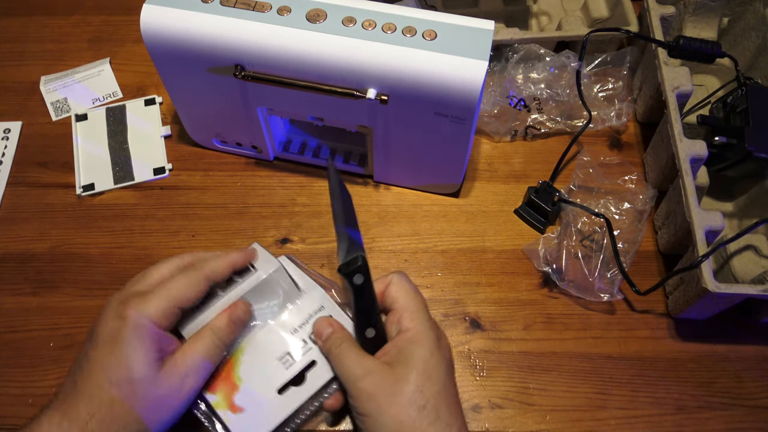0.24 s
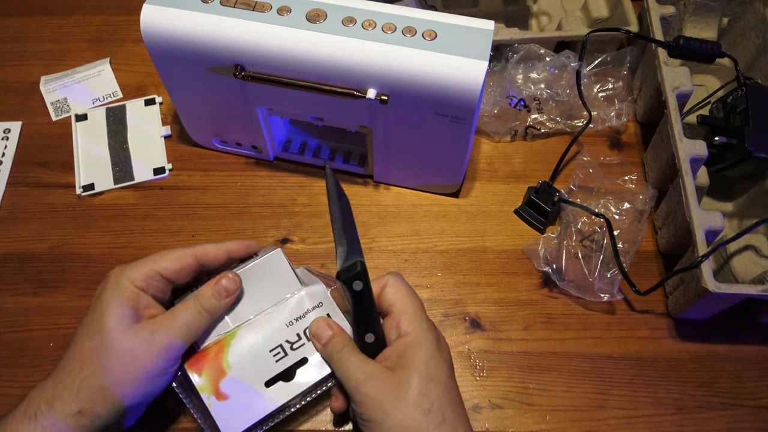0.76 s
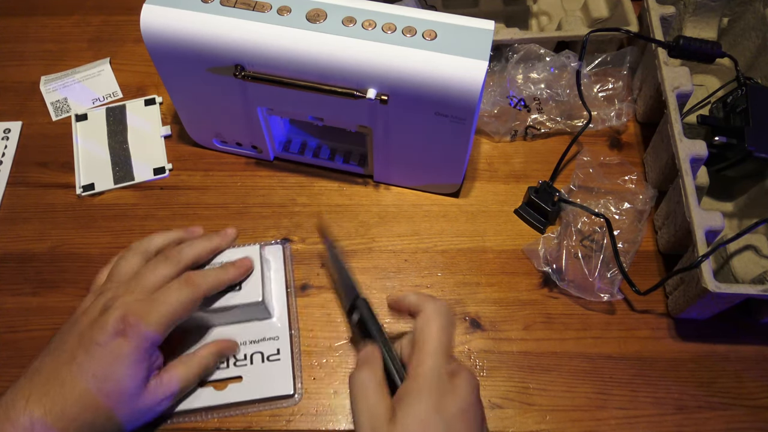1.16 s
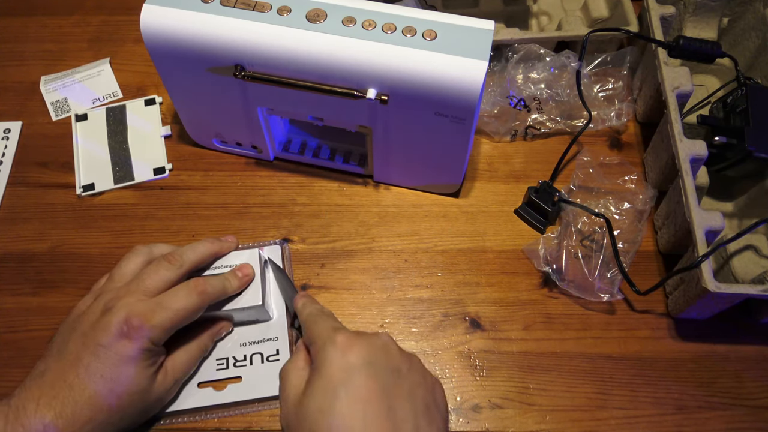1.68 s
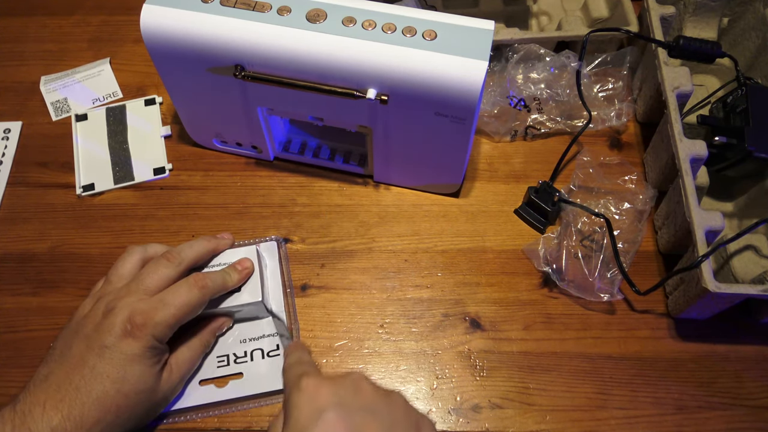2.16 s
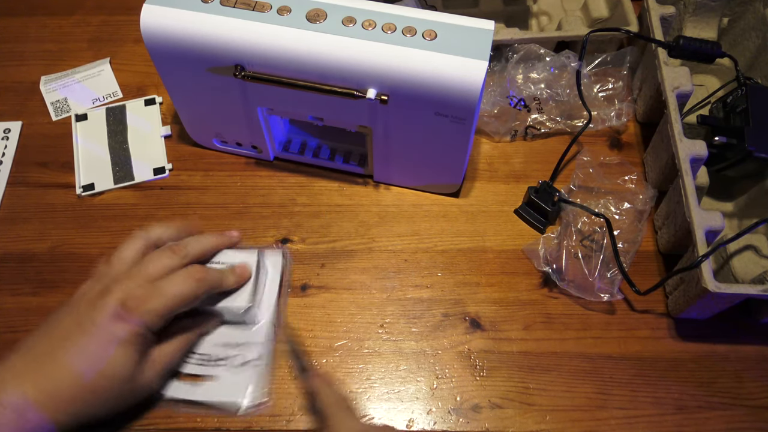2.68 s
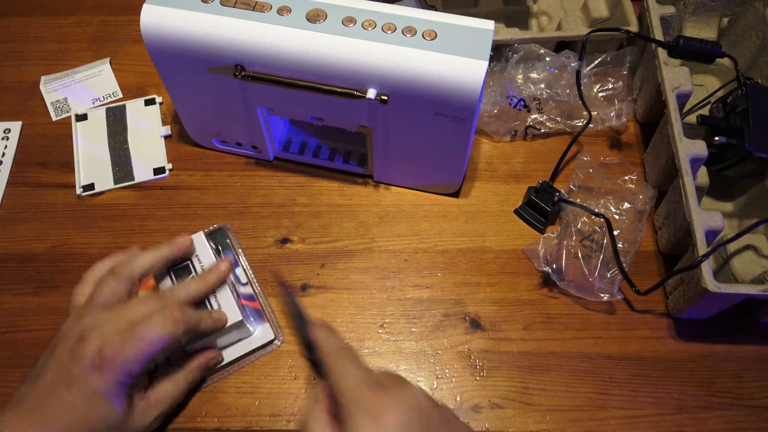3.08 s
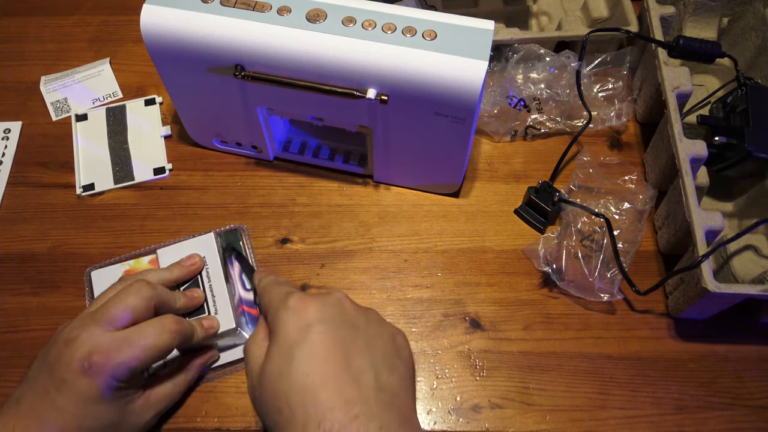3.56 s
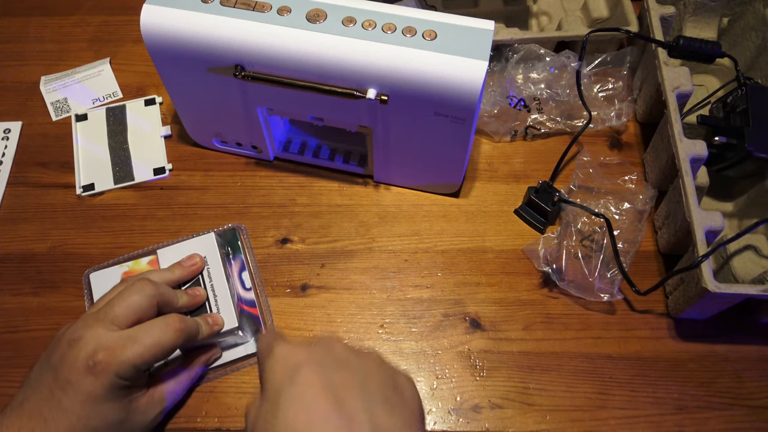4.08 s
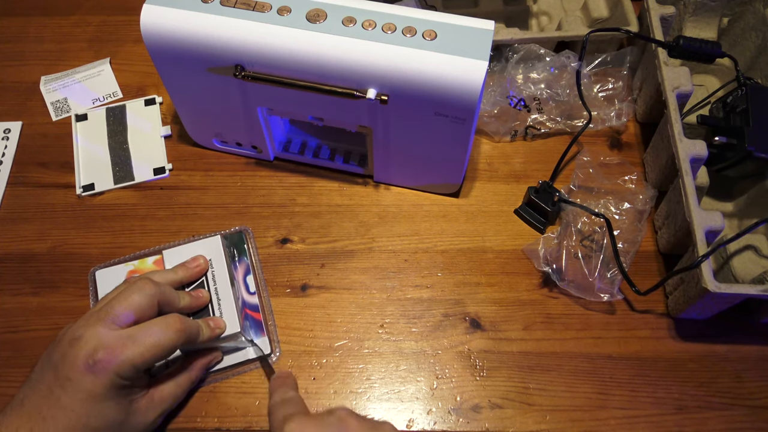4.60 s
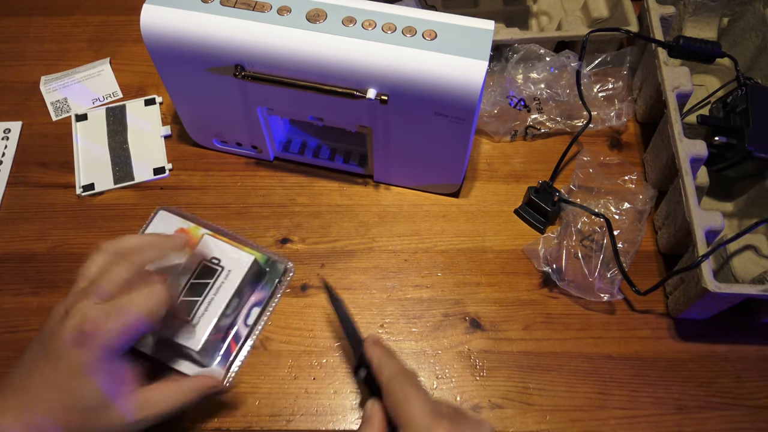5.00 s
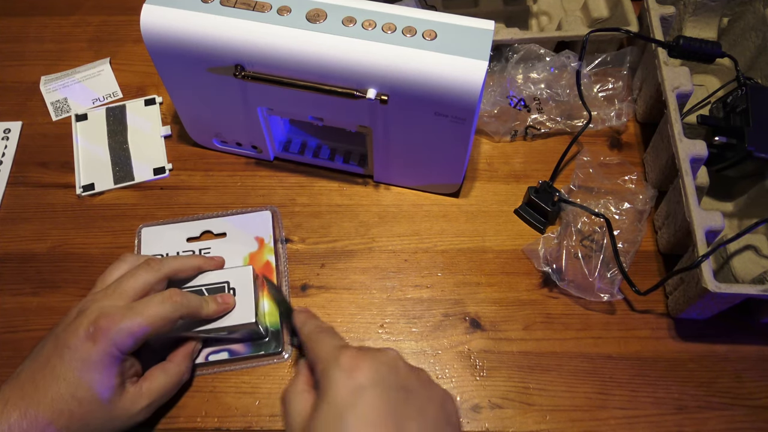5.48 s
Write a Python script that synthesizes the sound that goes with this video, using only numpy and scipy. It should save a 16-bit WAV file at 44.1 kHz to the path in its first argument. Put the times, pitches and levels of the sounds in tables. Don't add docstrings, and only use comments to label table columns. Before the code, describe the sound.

Close crackling and scraping of hard plastic packaging being cut by a knife, with sharp pops and two heavy wooden knocks indoors.

```python
import sys
import numpy as np
from scipy import signal
from scipy.fft import rfft, irfft, next_fast_len
from scipy.io import wavfile
from scipy.ndimage import uniform_filter1d

SR = 44100
rng = np.random.default_rng(int(sys.argv[2]) if len(sys.argv) > 2 else 0)


def pcm_store(signal):
    levels = np.round(np.clip(np.atleast_2d(signal), -1, 1) * 32767)
    wavfile.write(sys.argv[1], SR, levels.astype(np.int16).T)


def volts_from_decibels(level):
    exponent = np.asarray(level, float) / 20
    return 10 ** exponent


N = 253134
TIME = np.arange(N) / SR


def rms_one(x):
    return x / np.sqrt(np.mean(x ** 2) + 1e-20)


def in_time(rows):
    s, *columns = np.transpose(rows)
    return [np.interp(TIME, s, c) for c in columns]


def shaped(x, points, law=volts_from_decibels):
    size = next_fast_len(N + 4096)
    hz = np.maximum(np.arange(size // 2 + 1) * SR / size, 1)
    curve_hz, curve_db = np.transpose(points)
    db = np.interp(np.log(hz), np.log(curve_hz), curve_db)
    return irfft(rfft(x, size) * law(db), size)[..., :N]


def band(x, low_hz, high_hz):
    sos = signal.butter(2, [low_hz, high_hz], "band", fs=SR, output="sos")
    return signal.sosfilt(sos, x + 1e-18)


def resonate(x, modes):
    out = 0
    for k, (hz, width, db) in enumerate(modes):
        r = np.exp(-np.pi * width / SR)
        gain = (-1) ** k * volts_from_decibels(db) * (1 - r * r) / 2
        out = out + signal.lfilter([gain, 0, -gain], [1, -2 * r * np.cos(2 * np.pi * hz / SR), r * r], x)
    return out


def ring(clicks, hz, t60):
    r, w = volts_from_decibels(-60 / (t60 * SR)), 2 * np.pi * hz / SR
    return signal.lfilter([0, np.sin(w)], [1, -2 * r * np.cos(w), r * r], clicks + 1e-18)


def dying_after(clicks, t60):
    return signal.lfilter([1], [1, -volts_from_decibels(-60 / (t60 * SR))], clicks)


def grit(per_s, spread_db):
    sizes = volts_from_decibels(spread_db * np.minimum(rng.exponential(1, N), 5)) * rng.choice([-1, 1], N)
    return rms_one(sizes * (rng.random(N) < per_s / SR))


def marks(times, sizes):
    clicks = np.zeros(N)
    np.add.at(clicks, np.round(np.asarray(times) * SR).astype(int), sizes)
    return clicks


def strikes(s, db, modes, uneven_db):
    luck = rng.normal(0, uneven_db, (len(s), len(modes)))
    out = 0
    for k, (hz, level_db, t60) in enumerate(modes):
        blows = marks(s, volts_from_decibels(db + level_db + luck[:, k]))
        out = out + (-1) ** k * ring(blows, hz, t60)
    return out


def snaps(s, db, hollow_db, bright_db, hz):
    rattle, out = grit(12000, spread_db=3.0), np.zeros(N)
    parts = [(219, 576, hollow_db - 5.0, 0.085),
             (1000, 8200, -5.0, 0.05),
             (6000, 17900, bright_db - 9.5, 0.053)]
    for low_hz, high_hz, part_db, t60 in parts:
        clicks = marks(s, volts_from_decibels(db + part_db))
        scale = 1 / np.std(band(rattle, low_hz, high_hz))
        out += scale * band(dying_after(clicks, t60) * rattle + 2.4 * clicks, low_hz, high_hz)
    after = np.arange(2000) / SR
    starts = np.round(s * SR).astype(int)
    for start, level_db, pitch in zip(starts, db, np.broadcast_to(hz, len(s))):
        fall_db = 60 * after * pitch / 25
        tone = volts_from_decibels(level_db + 0.5 - fall_db) * np.sin(2 * np.pi * pitch * after)
        out[start:start + len(tone)] += tone[:N - start]
    return out


# f/Hz, level/dB per Hz
AIR_SPECTRUM = [(15, -29), (25, -22), (49, -2), (76, -12), (108, -20.5), (134, -2), (301, -2.5),
                (677, -15.5), (1190, -5.5), (1940, -22), (16000, -29)]


def room_air():
    return volts_from_decibels(-56.5) * rms_one(shaped(rng.standard_normal((2, N)), AIR_SPECTRUM))


def echoes(x, t60):
    t = np.arange(SR // 2) / SR
    tail = rng.standard_normal(len(t)) * volts_from_decibels(-60 * t / t60) * (t > .003)
    return signal.fftconvolve(x, tail / np.linalg.norm(tail))[:N]


def room(hits):
    return volts_from_decibels(-9) * signal.lfilter([.6], [1, -.4], echoes(hits, t60=0.28))


# f/Hz, width/Hz, level/dB
SHELL_MODES = [(700, 430, 3), (1480, 550, 9), (1900, 730, 0.5), (2680, 200, 3.5), (3950, 2350, -5.5),
               (5540, 1600, 12.5), (7350, 2970, 8.5)]


def friction():
    slips = grit(9000, spread_db=2.5) + 0.47 * grit(500, spread_db=2.5)
    return slips + 1.38 * resonate(slips, SHELL_MODES)


# t/s, level/dB
LEANS = [
    (0.23, -44),
    (0.9, -57),
    (1.15, -51),
    (1.95, -47.5),
    (2.12, -53),
    (3.96, -43.5),
    (4.1, -42),
    (4.33, -45.5),
    (5.2, -63),
]


def leg_shudder(slips):
    s, db = np.transpose(LEANS)
    dying = dying_after(marks(s, volts_from_decibels(db)), t60=0.52)
    swell = volts_from_decibels(-71) + uniform_filter1d(dying, int(0.02 * SR))
    return swell * (rms_one(band(slips, 52, 85)) + volts_from_decibels(-5.5) * rms_one(band(slips, 121, 159)))


# t/s, level/dB
HANDLING = [(0.0, -40), (0.45, -44.5), (0.62, -38.5), (0.84, -51), (1.2, -38), (1.4, -57), (1.56, -52),
            (1.93, -45.5), (2.3, -62), (2.45, -59), (2.7, -49), (3.32, -43.5), (3.52, -69), (3.9, -60),
            (4.44, -49), (4.75, -51), (5.1, -43.5), (5.62, -56)]


def handling():
    parts_db = np.array([[-2], [0], [-4.5]])
    return volts_from_decibels(2 * (in_time(HANDLING)[0] - 7.5 + parts_db))


def strokes(rows, film_db):
    rounding = 1.09
    damping = 0.15
    out = np.zeros((3, N))
    for s, db, rise, fall, weight_db in rows:
        rise = min(rise, 0.17)
        near = slice(max(int((s - 3 * rise) * SR), 0), int((s + 3 * fall) * SR))
        late = TIME[near] - s
        level_db = db - 20 * np.where(late < 0, -late / rise, late / fall) ** rounding
        parts_db = np.array([[weight_db], [0], [film_db - damping * weight_db]])
        out[:, near] += volts_from_decibels(2 * (level_db + parts_db))
    return out


# peak t/s, level/dB, rise/s, fall/s (20 dB each), board weight/dB
DRAGS = [(0.8, -45.5, 0.19, 0.07, 3.5), (0.878, -29.5, 0.017, 0.096, 3), (0.92, -28.5, 0.053, 0.06, -19),
         (1.0, -28.5, 0.15, 0.14, -23), (1.04, -31.5, 0.1, 0.021, -1.5), (1.125, -32, 0.13, 0.058, -9),
         (2.68, -37.5, 0.064, 0.27, -6.5), (2.74, -43.5, 0.094, 0.11, 7.5),
         (2.782, -25, 0.065, 0.22, -12.5), (2.83, -25.5, 0.054, 0.061, -8.5),
         (2.95, -42.5, 0.056, 0.14, 2.5), (3.09, -35.5, 0.023, 0.048, -3), (3.13, -39.5, 0.038, 0.038, -13),
         (3.235, -28.5, 0.027, 0.053, -8), (4.8, -33, .035, 0.36, -5.5), (4.865, -36.5, 0.06, 0.032, 1),
         (4.93, -23, 0.06, 0.086, -7), (5.2, -19.5, 0.041, 0.12, -5), (5.25, -20.5, 0.063, 0.031, -57),
         (5.4, -44.5, 0.21, 0.11, -1)]


def drags():
    return strokes(DRAGS, film_db=-6)


# peak t/s, level/dB, rise/s, fall/s (20 dB each), board weight/dB
TEARS = [(0.001, -36.5, 0.0087, 0.07, -17), (0.16, -48, 0.13, .1, -8), (0.2, -12, 0.005, 0.13, -16),
         (0.238, -15.5, 0.045, 0.089, -4.5), (1.44, -46.5, 0.025, 0.41, -15), (1.7, -59.5, 0.04, 0.064, 21),
         (2.0, -33.5, 0.09, 0.15, -1.5), (2.17, -43.5, 0.22, 0.18, 0.5), (3.625, -57.5, 0.037, 0.031, 8.5),
         (3.75, -57.5, 0.062, 0.058, 14.5), (3.79, -52.5, 0.11, 0.15, 3), (3.99, -26, 0.087, 0.12, -5),
         (4.06, -30, 0.023, 0.26, 1), (4.16, -34.5, 0.12, 0.13, -8), (4.36, -44, 0.19, 0.27, -4),
         (5.69, -43, 0.072, 0.23, -5)]


def tears():
    return strokes(TEARS, film_db=-4.5)


# f/Hz, level/dB, t60/s
BOARD_MODES = [(130, -23, 0.3), (211.6, -18.5, 0.55), (253.3, -1, 0.58), (275, -13.5, 0.2), (300, -7, 0.37),
               (330, -9.5, 0.052), (350.7, 2, 0.075), (418, -4, 0.066), (487.5, -2, 0.06),
               (653, -3.5, 0.042), (718, -3.5, 0.012), (816, -5.5, 0.054), (1073, -8.5, 0.1),
               (1212, -9, 0.046)]


def rasp(slips):
    board, shell, film = np.sqrt(handling() + tears() + drags())
    wood = resonate(slips, [(hz, 45.0, db) for hz, db, t60 in BOARD_MODES]) + 0.4 * slips
    return (board * rms_one(band(wood, 96, 1014)) + shell * rms_one(band(slips, 853, 4280))
            + film * rms_one(band(slips, 2240, 18740)))


# peak t/s, level/dB, swell/s, f/Hz, width/Hz
PANELS = [(0.899, -32, 0.02, 1000, 150), (2.79, -37, 0.078, 1440, 119), (2.79, -34.5, .06, 2100, 250),
          (2.8, -33, 0.052, 5560, 400), (2.96, -39, 0.044, 1290, 500), (2.96, -54, 0.021, 3045, 300),
          (3.09, -41.5, .03, 1200, 200), (3.21, -46, 0.021, 700, 120), (3.235, -40.5, 0.027, 1220, 150),
          (3.64, -56, .04, 1370, 80), (3.64, -58, .04, 1860, 80), (4.12, -43, 0.086, 1070, 50),
          (4.13, -47, 0.036, 577, 50), (4.83, -65, 0.055, 6900, 2000), (4.94, -39, 0.032, 1670, 500),
          (5.2, -30.5, 0.014, 3000, 400), (5.22, -39, 0.046, 1380, 200), (5.245, -29, 0.043, 6000, 1500),
          (5.39, -43.5, 0.047, 5640, 1200), (5.368, -28, 0.0063, 1590, 900),
          (0.98, -23.5, 0.0074, 1550, 600), (1.122, -27.5, 0.018, 1210, 200),
          (1.46, -43, 0.039, 6000, 2500), (1.45, -50, 0.033, 11000, 5000), (1.46, -45.5, 0.046, 3000, 1200),
          (0.221, -22.5, 0.03, 2850, 900), (4.32, -44, 0.027, 8900, 5000), (4.9, -33.5, 0.042, 1060, 400),
          (3.77, -49.5, 0.064, 1920, 350), (3.78, -55, 0.051, 3050, 400), (0.17, -47, .02, 8000, 2500),
          (1.96, -28, 0.013, 2070, 600), (3.929, -26.5, .012, 1550, 500)]


def panels():
    slips, out = grit(4000, spread_db=3.0), np.zeros(N)
    for s, db, swell, hz, width in PANELS:
        near = slice(int((s - 3 * swell) * SR), int((s + 3 * swell) * SR))
        sung = rms_one(resonate(slips[near], [(hz, width, 0)]))
        out[near] += volts_from_decibels(db - 9.9 * ((TIME[near] - s) / swell) ** 2) * sung
    return out


# t/s, f/Hz, level/dB, t60/s
SHELL_RING = [
    (1.981, 1730, -22, 0.28),
    (1.981, 2960, -20.5, 0.27),
    (1.69, 1330, -38, 0.23),
]


def shell_ring():
    noise, out = rng.standard_normal(N), 0
    for s, hz, db, t60 in SHELL_RING:
        decay = volts_from_decibels(db - 60 * np.maximum(TIME - s, 0) / t60) * (TIME > s)
        out = out + decay * rms_one(resonate(noise, [(hz, 250, 0)]))
    return out


# t/s, level/dB
BLADE_PRESS = [
    (1.68, -72),
    (1.76, -62),
    (1.94, -57),
    (1.96, -87),
    (2.42, -85),
    (2.47, -66),
    (2.62, -60),
    (2.72, -64),
    (2.76, -85),
]
# f/Hz, width/Hz, level/dB
BLADE_MODES = [
    (3830, 193, 8),
    (6250, 150, 0),
]


def blade():
    return volts_from_decibels(in_time(BLADE_PRESS)[0]) * rms_one(resonate(rng.standard_normal(N), BLADE_MODES))


# t/s, slip rate f/Hz, level/dB
CREAK = [
    (4.275, 690, -36),
    (4.287, 600, -31),
    (4.312, 574, -36.5),
]


def creak():
    hz, db = in_time(CREAK)
    flutter = rms_one(band(rng.standard_normal((2, N)), 40, 490))
    phase = 2 * np.pi * np.cumsum(hz * (1 + 0.018 * flutter[0])) / SR
    sounding = (TIME > CREAK[0][0]) & (TIME < CREAK[-1][0])
    partials = [(1, -4), (2, -3), (3, -3), (4, -14), (6, -12)]   # multiple, dB
    wave = sum(volts_from_decibels(level) * np.sin(k * phase) for k, level in partials)
    return volts_from_decibels(db + 3.5 * flutter[1]) * sounding * wave


# t/s, f/Hz, level/dB
SQUEALS = [
    [(4.277, 6000, -54), (4.283, 6870, -40.5), (4.29, 8500, -44), (4.297, 8900, -37), (4.3, 11400, -35),
     (4.306, 14800, -32), (4.314, 15500, -55)],
    [(4.35, 15700, -55), (4.354, 14000, -42), (4.359, 10430, -50), (4.364, 11540, -45), (4.37, 15100, -34),
     (4.374, 15800, -55)],
    [(4.278, 11400, -52), (4.281, 12600, -43), (4.291, 12950, -42)],
    [(4.36, 10430, -46), (4.366, 11400, -43), (4.376, 11400, -53)],
    [(4.3, 10900, -42), (4.308, 12000, -42), (4.314, 15000, -42)],
]


def squeals():
    waver, broken = rms_one(band(rng.standard_normal((2, N)), 120, 900))
    out = 0
    for rows in SQUEALS:
        hz, db = in_time(rows)
        sounding = (TIME > rows[0][0]) & (TIME < rows[-1][0])
        phase = 2 * np.pi * np.cumsum(hz * (1 + 0.0081 * waver)) / SR
        out = out + volts_from_decibels(db + 9) * (0.7 + broken) * sounding * np.sin(phase)
    return out


# peak t/s, level/dB, deep modes/dB
KNOCKS = [
    (0.222, -24, -20),
    (1.949, -13, -4),
    (1.952, -8, -4.5),
    (1.981, -32, 0),
    (3.919, -3, -11.5),
    (3.924, -10, -3.5),
    (3.962, -2.5, -7.5),
]
# peak t/s, level/dB, deep modes/dB
HELD_KNOCKS = [
    (0.865, -20, -15),
    (1.014, -16.5, -6),
    (1.032, -18, 6.5),
    (1.075, -36, 9),
    (1.166, -19, -3.5),
    (1.582, -27.5, -2),
    (4.884, -18, -4),
    (5.175, -21, -4),
]


def knocks():
    deep_limit_hz = 310
    upper = [mode for mode in BOARD_MODES if mode[0] > deep_limit_hz]
    out = 0
    for rows, share in [(KNOCKS, 1), (HELD_KNOCKS, .33)]:
        s, db, deep_db = np.transpose(rows)
        deep = [(hz, level_db, share * t60) for hz, level_db, t60 in BOARD_MODES if hz < deep_limit_hz]
        out = out + strikes(s, db + deep_db, deep, uneven_db=5.0)
        out = out + strikes(s, db, upper, uneven_db=4.5)
    return volts_from_decibels(-11.0) * out


# peak t/s, level/dB, hollow part/dB, f/Hz
BUMPS = [(0.086, -33, -27, 1220), (0.1218, -25, -33, 1230), (0.183, -26, -12, 1180), (0.84, -36, -14, 1200),
         (1.4725, -32, -30, 2020), (1.511, -25.5, -22, 1440), (1.5398, -31, -26, 1380),
         (1.6729, -29, -6, 1190), (1.915, -39, 0, 1320), (2.934, -28.5, -16, 1160), (3.343, -45.5, 2, 800),
         (3.387, -40.5, -14, 1360), (3.6105, -25, -5, 1900), (4.465, -26, -8, 2630),
         (4.3174, -22.5, -9, 2720), (4.6825, -33.5, -7, 2030), (4.773, -28.5, -28, 683),
         (4.789, -22, -19, 1560), (4.9, -17.5, -7, 700), (5.196, -20, -22, 955)]


def bumps():
    s, db, hollow_db, hz = np.transpose(BUMPS)
    return band(snaps(s, db, hollow_db, -12, hz), 100, 3200)


# peak t/s, level/dB
CATCHES = [(3.7045, -32), (3.7125, -42), (3.7265, -35), (3.7362, -37), (3.7455, -36), (3.7565, -32),
           (3.7655, -34), (3.775, -38), (3.786, -32), (3.7975, -32), (3.807, -30), (3.8195, -31),
           (3.833, -31.5), (3.8595, -32.5)]
# f/Hz, level/dB, t60/s
JUDDER_MODES = [(700, -10, 0.014), (1370, -7.5, 0.034), (1640, -5, .02), (1850, -1, 0.025),
                (2080, -1.5, 0.017), (2300, -3, 0.014), (3000, -6.5, 0.023), (3400, -11, .015),
                (4170, -11, .015), (5840, -9.5, 0.011)]


def judder():
    s, db = np.transpose(CATCHES)
    dull = band(snaps(s, db - 3.5, -16, 3.0, 2600), 100, 3200)
    return dull + volts_from_decibels(-4.0) * strikes(s, db, JUDDER_MODES, uneven_db=4.5)


# peak t/s, level/dB, f/Hz
PEEL = [(0.4473, -39, 5000), (0.475, -31.5, 4880), (0.499, -32, 3230), (0.5115, -32.5, 4095),
        (0.5297, -29.5, 4100), (0.551, -27, 4070), (0.573, -23.5, 4000), (0.598, -26, 4000),
        (0.654, -32.5, 4600), (0.6794, -21.5, 3930), (0.717, -23.5, 3960), (0.73, -30, 1900),
        (0.7558, -24.5, 5710), (0.771, -25, 3970), (0.816, -32, 2500)]
# f/Hz, level/dB, t60/s
SEAM_MODES = [(1550, -13, 0.066), (2600, -11.5, 0.027), (3000, -8, 0.041), (4000, -1, 0.039),
              (4780, -5, 0.018), (5750, -1.5, 0.035), (6280, -4, 0.032), (8180, -1, 0.0096)]


def peel():
    s, db, hz = np.transpose(PEEL)
    return snaps(s, db, -12, 2.5, hz) + volts_from_decibels(-8.5) * strikes(s, db, SEAM_MODES, uneven_db=4.5)


# peak t/s, level/dB, f/Hz
FLICKS = [(0.3736, -22.5, 6800), (0.123, -39, 2400), (1.346, -45, 5500), (1.4825, -18, 5900),
          (2.4164, -49, 595), (2.4723, -46.5, 694.7), (3.8881, -46, 2130), (4.538, -40, 6000),
          (4.549, -40.5, 7900), (4.6357, -40.5, 7840), (5.5615, -45, 5000), (0.027, -33.5, 7100)]


def flicks():
    s, db, hz = np.transpose(FLICKS)
    return snaps(s, db, -22, 8, hz)


# peak t/s, level/dB, bright part/dB, f/Hz
POPS = [(1.1007, -21.5, 1, 653), (1.126, -22.5, 2, 796), (1.166, -22.5, -4, 488), (1.5805, -33, -13, 530),
        (1.5871, -36.5, 3, 530), (1.948, -10, -0.5, 700), (2.135, -35, -20, 700), (2.5348, -30.5, 0, 700),
        (2.6268, -33, -4, 1230), (2.7292, -26, -3, 723), (3.117, -28, 4.5, 700), (3.593, -44, -12, 533),
        (3.728, -36, 0, 447), (3.716, -42, -21, 730), (3.9187, -13, -4, 700), (3.962, -8.5, -3, 2600),
        (4.15, -24.5, 0, 1650), (4.2152, -25.5, -3, 1660), (4.8874, -20.5, -4.5, 660),
        (5.0649, -37.5, -20, 700), (5.1742, -19.5, -12, 780), (5.279, -19, -8, 1010), (5.493, -42, 7, 1650),
        (5.5759, -35.5, -4, 577), (5.6443, -34, 1, 580)]


def pops():
    s, db, bright_db, hz = np.transpose(POPS)
    return snaps(s, db, -2, bright_db, hz)


# peak t/s, level/dB, f/Hz
STABS = [
    (1.4141, -11, 6000),
    (5.3632, -12, 1780),
    (5.671, -16, 1980),
]


def stabs():
    s, db, hz = np.transpose(STABS)
    return snaps(s, db, -26, -1.5, hz)


# peak t/s, level/dB, hollow part/dB, f/Hz
FOLDS = [(0.195, -8.5, -16, 1220), (0.768, -39.5, 8, 600), (0.977, -8.5, -19, 2540),
         (1.597, -32.5, -19, 1370), (1.872, -38.5, -8, 3600), (1.9604, -15, -28, 710),
         (1.9793, -12, -16, 1400), (2.6354, -42, -18, 950), (3.093, -30.5, -26, 1200),
         (4.23, -25, -6, 2020), (4.691, -29, -11, 1620), (4.806, -37, -7, 1500), (4.878, -30, -10, 700),
         (4.897, -32, -4, 1980), (5.371, -27, -17, 1090), (5.1445, -30.5, -22, 885)]


def folds():
    s, db, hollow_db, hz = np.transpose(FOLDS)
    return snaps(s, db, hollow_db, 0, hz)


# f/Hz, level/dB
COLOUR = [(100, -3.5), (250, -3.5), (900, 2.5), (2500, 1.5), (4500, 0), (8000, 2), (11000, 0),
          (16000, -14.5)]
# f/Hz, side against mid level/dB
SPREAD = [(60, -24), (130, -20.5), (250, -20), (500, -19.5), (1000, -24), (2200, -42), (4400, -32),
          (8120, -12.5), (15000, -16.5)]
# f/Hz, left over right level/dB
BALANCE = [(60, -4.5), (180, -0.5), (550, 2.5), (1650, -1.6), (4970, -2), (15000, 2.5)]


def two_ports(dry_sound, air):
    mid = shaped(dry_sound, COLOUR)
    side = shaped(echoes(mid, 0.014) + volts_from_decibels(9.0) * air[1], SPREAD)
    side += shaped(mid, BALANCE, law=lambda db: (volts_from_decibels(db) - 1) / (volts_from_decibels(db) + 1))
    return np.array([mid + air[0] + side, mid + air[0] - side])


def scene():
    hits = creak() + squeals() + knocks() + bumps() + judder()
    hits = hits + peel() + flicks() + pops() + stabs() + folds()
    hits = signal.sosfilt(signal.butter(2, 100, "high", fs=SR, output="sos"), hits)
    slips = friction()
    rubbing = leg_shudder(slips) + rasp(slips) + panels() + shell_ring() + blade()
    return two_ports(hits + room(hits) + rubbing, room_air())


def roll_off(x):
    return signal.sosfilt(signal.butter(12, 16990, fs=SR, output="sos"), x)


def record(dry):
    soft = 0.79 * np.tanh(dry / 0.82)
    cut = signal.sosfilt(signal.cheby2(10, 60, 16900, fs=SR, output="sos"), soft)
    return roll_off(cut)


dry = scene()
out = record(dry)
pcm_store(out)
```